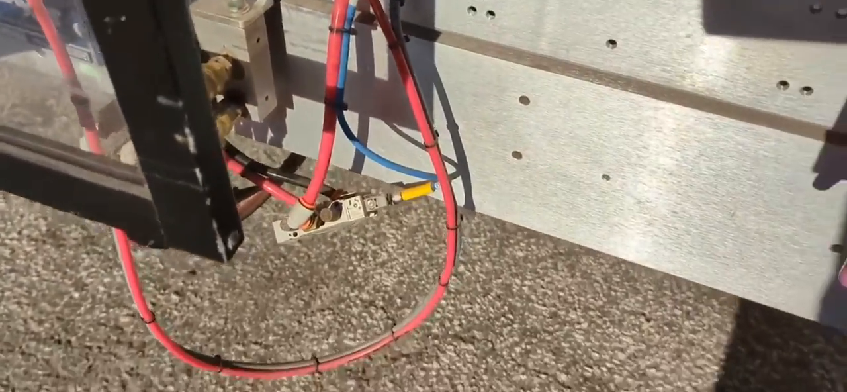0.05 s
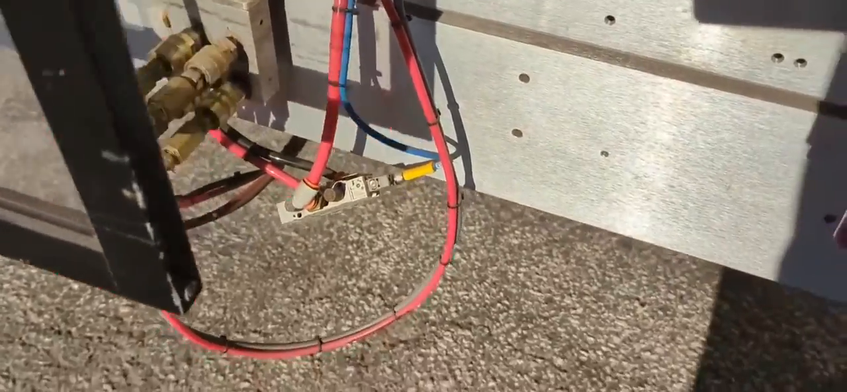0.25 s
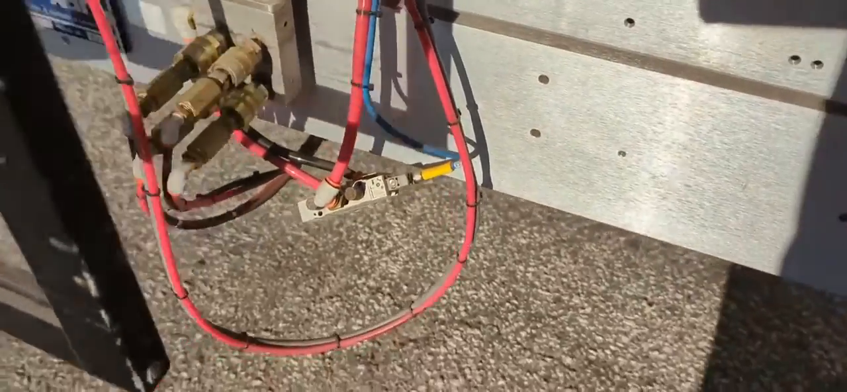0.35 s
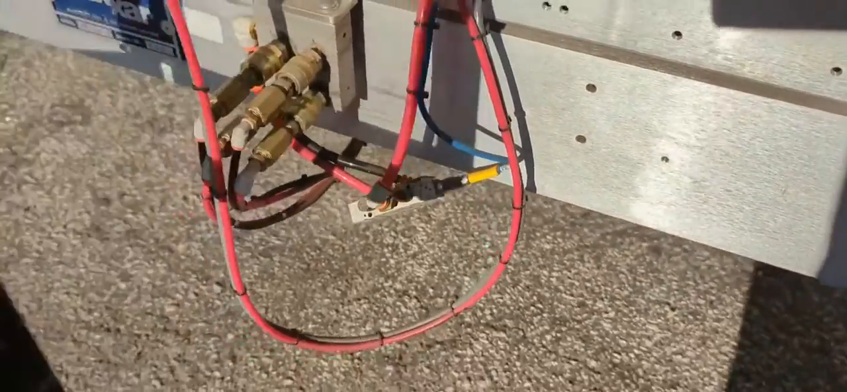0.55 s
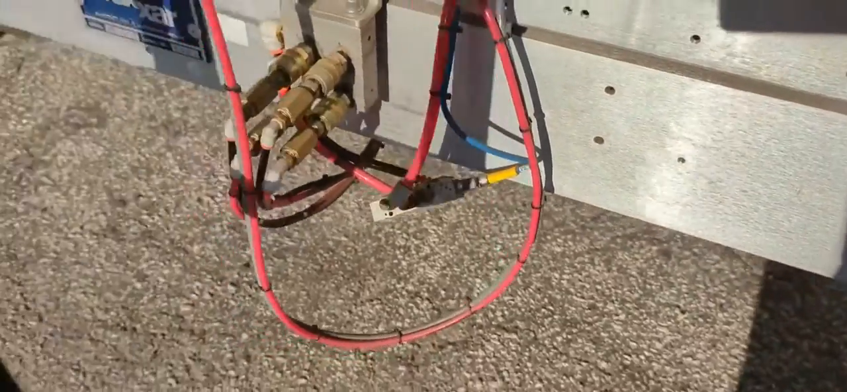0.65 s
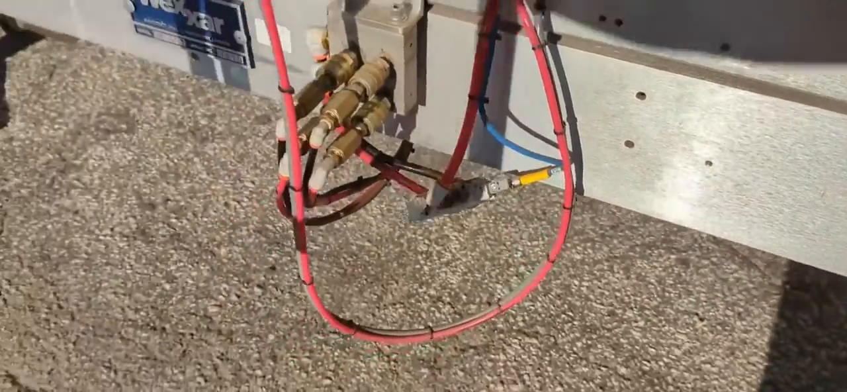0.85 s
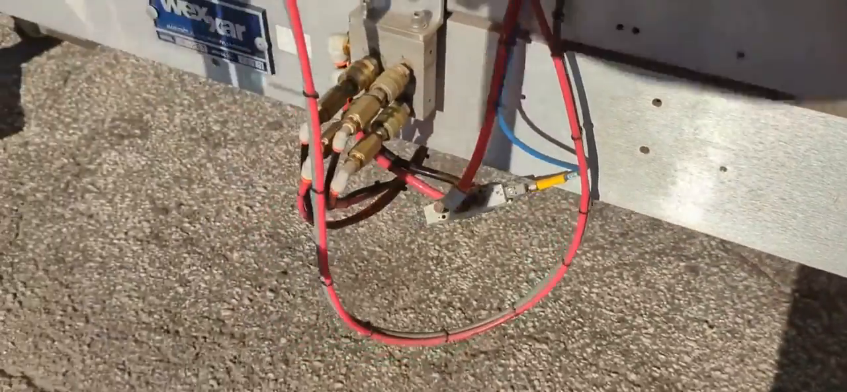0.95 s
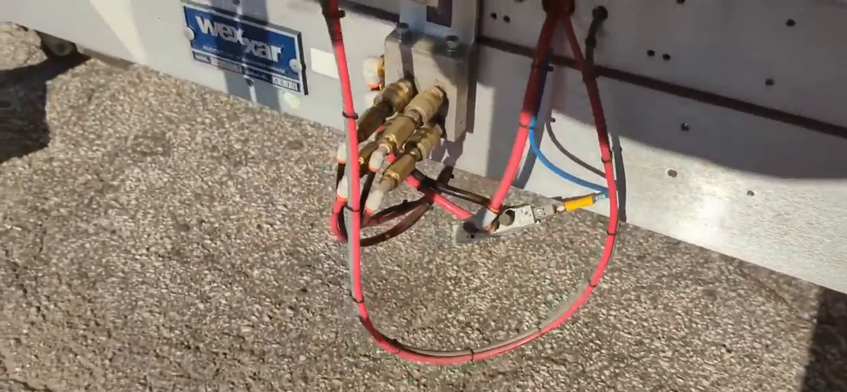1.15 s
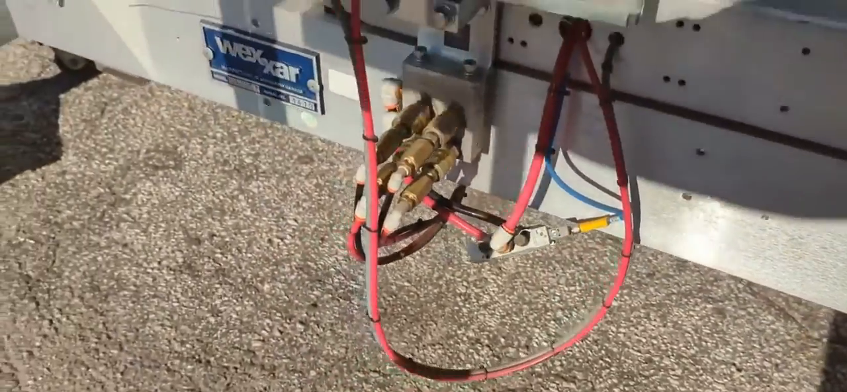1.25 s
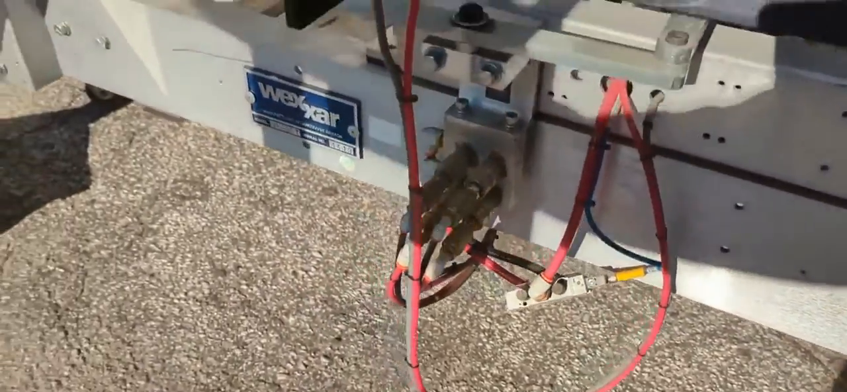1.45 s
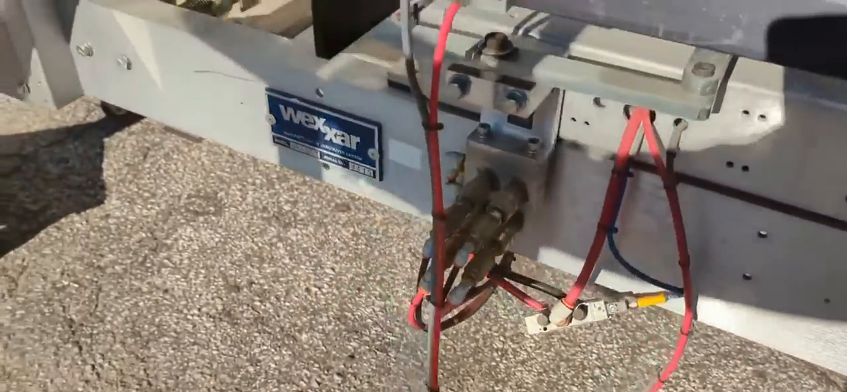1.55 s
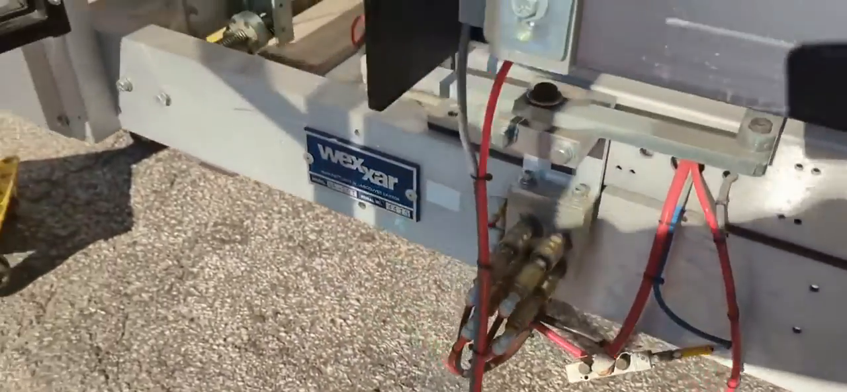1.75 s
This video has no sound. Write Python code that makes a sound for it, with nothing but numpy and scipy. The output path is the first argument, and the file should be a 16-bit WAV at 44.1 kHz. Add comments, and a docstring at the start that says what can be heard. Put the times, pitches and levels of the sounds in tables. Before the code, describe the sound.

Sharp clack and short rattle of a metal machine panel, followed by a gritty shoe scuff.

```python
"""A framed metal panel on a machine is swung aside outdoors: its catch clacks, the frame thumps and
rattles to rest. Each contact wakes a wash of crowded modes and a few clear ones; the hardest hits
add sharp slaps and a short ring from the catch. Then a shoe scuffs the gritty pavement and sets
down, while distant traffic and low wind swell behind."""
import sys
import numpy as np
from scipy import signal
from scipy.fft import rfft, irfft
from scipy.io import wavfile
from scipy.ndimage import uniform_filter1d

SR = 44100
rng = np.random.default_rng(int(sys.argv[2]) if len(sys.argv) > 2 else 0)


def transcribe(u):
    """Save the signal u as a 16-bit wav file named by the first command-line argument.

    u: samples, shape (n,) or (channels, n), limited to [-1, 1]; the rate is SR.
    q: integer samples, one column per channel.
    """
    v = np.clip(np.atleast_2d(u).T, -1, 1)
    q = np.round(v * 32767).astype(np.int16)
    wavfile.write(sys.argv[1], SR, q)


N = 79380
TIME = np.arange(N) / SR
BIN_HZ = np.maximum(np.arange(N // 2 + 1) * SR / N, 1)

# The panel's hits. Each row: start in seconds, drive in dB for the bass, hollow, body, clank and
# treble registers, pan in dB (plus is left).
CONTACTS = [(0.14, -56, -45.5, -50.5, -41, -65, -0.5), (0.161, -42.5, -42, -54, -53, -61, 2),
            (0.1794, -48, -46, -42, -40, -39.5, -1), (.185, -46.5, -42, -39, -41, -63, -2),
            (0.201, -58, -42, -42, -32.5, -66.5, -5.5), (0.2187, -60, -43, -33.5, -29, -20, 0.5),
            (0.2242, -56, -34, -25, -16.5, -36, -1.5), (0.236, -40, -36, -43.5, -24, -30.5, -1.5),
            (0.2552, -49.5, -47, -35.5, -28.5, -28.5, -1.5), (0.2768, -60, -31, -34, -30, -45.5, 3),
            (0.2944, -39, -30, -40, -48, -56, 1), (0.3104, -33, -35, -33, -31, -47, -1.5),
            (0.314, -34.5, -28, -28, -35, -80, 4), (0.331, -33, -35, -47.5, -46, -62, -2.5),
            (0.3417, -54, -58, -35, -36, -59.5, -5.5), (0.4081, -51.5, -45, -40, -44, -73, -5.5),
            (.423, -54.5, -50.5, -45.5, -61.5, -75, -3.5), (0.465, -56, -53.5, -45, -53.5, -79, -2),
            (0.5879, -54.5, -50.5, -44.5, -43.5, -82, -3)]
# The panel's five registers. Each row: low and high edge in Hz, trim in dB, attack and t60 in
# seconds, relative tail level in dB, tail t60 in seconds.
REGISTERS = [(160, 300, -2, .004, 0.049, -11, 0.22), (300, 560, -2.5, 0.0032, 0.14, -16.5, 0.52),
             (560, 1540, 0.5, 0.0011, 0.097, -22.5, 0.57), (1220, 3200, -4.5, 0.00052, 0.077, -26, 0.68),
             (2800, 23000, -1, 0.0012, 0.067, -28.5, 0.36)]
# Clear tones of the metal. Each row: pitch in Hz, dB against its register on a catch hit and on a
# frame hit, t60 in seconds, pan in dB.
CLEAR_MODES = [(203, -2, 1, 0.087, 1.5), (234, 1.5, 8, 0.1, 1.5), (377.6, -6.5, -4, 0.094, 4.5),
               (428, -7.5, -4, 0.11, 6), (518.3, -3.5, 3, 0.09, -4.5), (634, 1, -3, 0.032, 1.5),
               (722.5, -2.5, -13.5, 0.07, -0.5), (837, -17.5, -6, 0.1, 0.5), (933, -3.5, -18.5, 0.13, 0),
               (1104, -8, -10.5, 0.08, -3.5), (1409, -25, -9, 0.12, -1.5), (1923, -8.5, -10, .14, -9.5),
               (2196, -6.5, -27, 0.075, -3), (2438, -7.5, -15, 0.096, -1.5), (4220, -19.5, -16, 0.11, -2.5),
               (7000, -25, -13, .1, 7)]
# The catch's hardest hits. Each row: start in seconds, level in dB, pitch in Hz.
CATCH_RINGS = [(0.2179, -18, 7040), (0.2238, -24, 7090), (0.2541, -27.5, 6790)]
# Small ticks, mostly grit. Each row: start in seconds, level in dB, centre and width in Hz, t60 in seconds.
GRIT_TICKS = [(0.046, -51.5, 10300, 7000, 0.023), (0.732, -68.5, 7000, 8000, 0.039),
              (0.7772, -52, 3590, 1503, 0.023), (1.181, -52.5, 3920, 1800, 0.021),
              (1.308, -33, 1720, 1400, 0.013), (1.315, -38, 2160, 1006, .016),
              (1.334, -44, 3420, 3560, 0.017), (1.345, -38, 2150, 900, 0.016),
              (1.3531, -35, 2800, 3040, 0.0099), (1.3752, -43.5, 4560, 4590, 0.019),
              (1.4461, -31, 3100, 280, 0.017), (1.4465, -54.5, 4730, 3600, 0.037),
              (1.653, -63.5, 7000, 7900, 0.041)]
# The shoe landing. Each row: start in seconds, level in dB, t60 in seconds.
SOLE_LANDINGS = [(1.366, -33.5, 0.23), (1.381, -36.5, 0.32), (1.438, -41.5, 0.27)]

# Tone curves. Each row: frequency in Hz, relative spectral density in dB.
METAL_TONE = [(130, -9.5), (400, -3.5), (660, -1.5), (830, -3.5), (1100, -3), (1330, -12.5), (1700, -2.5),
              (2000, 5), (2450, 0.5), (2750, -12.5), (3400, -11.5), (3800, -14), (4400, -13), (6000, -15.5),
              (7050, -6.5), (7900, -15.5), (12000, -17), (13100, -27), (14800, -18.5), (16000, -31.5)]
GRIT_TONE = [(700, -19.5), (1400, 3.5), (2300, 4), (3100, -10), (4500, -12.5), (7000, -23.5),
             (12000, -23.5), (16000, -31)]
THUD_TONE = [(50, -42.5), (110, 2.5), (200, -1.5), (340, -3.5), (550, -13), (1200, -29), (4000, -74)]
TYRE_TONE = [(60, -11), (130, -3.5), (200, -0.5), (300, -6.5), (520, -1.5), (750, -1), (1100, -4.5),
             (1600, -9), (2400, -15.5), (3100, -30.5), (7000, -48), (15000, -60)]
ENGINE_TONE = [(15, -49.5), (30, -27), (50, -22.5), (68, -8.5), (81, 3), (92, -17), (130, -14),
               (300, -39.5), (1000, -81.5)]
WIND_TONE = [(15, -38.5), (30, -13), (45, -3), (60, 2), (125, 1.5), (200, -3.5), (320, -17.5), (800, -27.5),
             (3000, -69)]
HISS_TONE = [(400, -9), (1300, 1.5), (2500, -1.5), (3300, -13.5), (5000, -24), (7000, -26), (9000, -32),
             (16000, -33)]

# Stereo images. Each row: frequency in Hz, left-right correlation.
METAL_IMAGE = [(240, 0.97), (400, .88), (600, .75), (1000, -.15), (2500, -0.073), (12000, -0.083)]
TYRE_IMAGE = [(100, 1), (300, 0.82), (600, .5), (1100, -0.54), (2500, 0.062), (10000, -0.16)]
BASS_IMAGE = [(30, 0.97), (200, 0.95)]

# Fader rides for the background. Each row: time in seconds, level in dB.
TYRE_FADER = [(0, -56.5), (.68, -51), (.76, -54.5), (.94, -53), (1.05, -45.5), (1.3, -44.5), (1.8, -43)]
ENGINE_FADER = [(0, -66.5), (.3, -54), (.8, -66.5), (1.1, -57), (1.22, -49.5), (1.5, -47), (1.8, -48.5)]
WIND_FADER = [(0, -73), (1.1, -67), (1.35, -59), (1.46, -47.5), (1.58, -50), (1.8, -45.5)]
HISS_FADER = [(0, -57.5), (.65, -60.5), (1.8, -67.5)]


def panel():
    """Hits wake crowded and clear modes in five registers; a faint tail hangs in the machine and yard."""
    out = 0
    for register, (low, high, _, _, t60, tail_db, tail_t60) in enumerate(REGISTERS):
        energy = contact_energy(register)
        power = ring_down(energy, t60) + from_db(tail_db) ** 2 * ring_down(energy, tail_t60)
        crowded_modes = coloured(stereo_noise(METAL_IMAGE), METAL_TONE, band=(low, high))
        out += np.sqrt(power) * steadied(crowded_modes, samples=400)
        for hz, catch_db, frame_db, mode_t60, pan in CLEAR_MODES:
            home_register = sum(hz > top for _, top, *_ in REGISTERS[:-1])
            if home_register == register:
                mode_power = ring_down(contact_energy(register, catch_db, frame_db), mode_t60)
                out += panned(pan) * np.sqrt(mode_power) * clear_tone(hz)
    return out


def contact_energy(register, catch_db=0, frame_db=0, frame_from_s=0.275):
    """Energy the hits feed into one register: first the catch strikes, then the frame."""
    hits = np.array(CONTACTS)
    starts, drive_db, pan = hits[:, 0], hits[:, 1 + register], hits[:, -1]
    trim_db, attack = REGISTERS[register][2:4]
    striker_db = np.where(starts < frame_from_s, catch_db, frame_db)
    hit_db = drive_db + trim_db + striker_db + pan * [[0.5], [-0.5]]
    impulses = np.zeros((2, N))
    impulses[:, (starts * SR).astype(int)] = from_db(hit_db) ** 2
    pole = np.exp(-1 / (attack * SR))  # softens the front of each hit
    return signal.lfilter([1 - pole], [1, -pole], impulses + 1e-18)


def ring_down(energy, t60):
    """Energy left ringing as each hit dies away."""
    return signal.lfilter([1], [1, -from_db(-120 / (t60 * SR))], energy + 1e-18)


def clear_tone(hz):
    """One mode of the metal: a sine, widened by a phase offset between left and right."""
    offset = np.arccos(np.clip(at_hz(METAL_IMAGE, hz), -1, 1))
    return np.sin(2 * np.pi * (hz * TIME + rng.random()) - offset * np.array([[0], [1]]))


def catch_ring(width_hz=260):
    """The small steel catch pings, its pitch shifting with the way it is struck."""
    out = 0
    for start, db, hz in CATCH_RINGS:
        ring = bandpass(rng.standard_normal((2, N)), hz - width_hz / 2, hz + width_hz / 2)
        out += from_db(db) * strike(start, attack=0.00099, t60=0.036) * steadied(ring, samples=100)
    return panned(db=-2) * out


def catch_chatter(slaps_per_s=400, fade_s=0.0013, boost_db=18.5):
    """A few milliseconds of sharp slaps as the metal faces meet."""
    force = sum(from_db(treble_db + boost_db) * (TIME > start) * np.exp(-np.abs(TIME - start) / fade_s)
                for start, *_, treble_db, _ in CONTACTS)
    slaps = (rng.random((2, N)) < slaps_per_s / SR) * rng.choice([-1, 1], (2, N))
    return bandpass(force * slaps, 600, 7000, order=1)


def shoe_scuff(peak_s=1.35, rise_s=0.023, fall_s=0.038, grains_per_s=2600):
    """The sole drags over grit: a quick swell of tiny crunches."""
    swell = np.exp(-np.abs(TIME - peak_s) / np.where(TIME < peak_s, rise_s, fall_s))
    grains = (rng.random((2, N)) < grains_per_s / SR) * rng.standard_normal((2, N))
    return from_db(-44) * swell * coloured(grains, GRIT_TONE)


def grit_ticks(spray_db=-23.5):
    """Small stones tick, each with a broad spray of dust."""
    out = 0
    white = rng.standard_normal((2, N))
    for start, db, hz, width, t60 in GRIT_TICKS:
        stone = steadied(bandpass(white, hz - width / 2, hz + width / 2), samples=200)
        envelope = from_db(db) * strike(start, attack=0.00051, t60=t60)
        out += envelope * (stone + from_db(spray_db) * white)
    return out


def shoe_thud():
    """The shoe sets down in three soft, overlapping thuds."""
    power = sum((from_db(db) * strike(start, attack=0.01, t60=t60)) ** 2
                for start, db, t60 in SOLE_LANDINGS)
    return np.sqrt(power) * steadied(coloured(stereo_noise(BASS_IMAGE), THUD_TONE), samples=1200)


def traffic():
    """A far tyre wash swells over a narrow engine rumble."""
    tyres = panned(db=-1.5) * coloured(stereo_noise(TYRE_IMAGE), TYRE_TONE)
    engine = steadied(coloured(stereo_noise(BASS_IMAGE), ENGINE_TONE), samples=4000)
    return fader(TYRE_FADER) * tyres + fader(ENGINE_FADER) * engine


def wind():
    """Low wind builds towards the end."""
    return fader(WIND_FADER) * coloured(stereo_noise(BASS_IMAGE), WIND_TONE)


def air_hiss():
    """A thin, wide hiss slowly sinks away."""
    return fader(HISS_FADER) * coloured(rng.standard_normal((2, N)), HISS_TONE)


def from_db(db):
    """Decibels to gain."""
    return 10 ** (np.asarray(db) / 20)


def fader(ride):
    """Gain over time along a fader ride."""
    return from_db(np.interp(TIME, *np.transpose(ride)))


def panned(db):
    """Left and right gains; plus leans left."""
    return from_db([[db / 2], [-db / 2]])


def strike(start, attack, t60):
    """Envelope with a quick rise and an exponential fall, all times in seconds."""
    age = np.maximum(TIME - start, 0)
    return (1 - np.exp(-age / attack)) * from_db(-60 * age / t60)


def at_hz(curve, hz):
    """Read a curve on a log-frequency axis."""
    points_hz, values = np.transpose(curve)
    return np.interp(np.log(hz), np.log(points_hz), values)


def bandpass(x, low_hz, high_hz, order=2):
    """Keep the band between two edges."""
    return signal.sosfilt(signal.butter(order, [low_hz, high_hz], "band", fs=SR, output="sos"), x)


def coloured(x, tone, band=None):
    """EQ x with a tone curve and optional steep band edges in Hz; comes out at rms 1."""
    gain = from_db(at_hz(tone, BIN_HZ))
    if band:
        gain /= np.sqrt((1 + (band[0] / BIN_HZ) ** 12) * (1 + (BIN_HZ / band[1]) ** 24))
    shaped = irfft(rfft(x) * gain, N)
    return shaped / shaped.std()


def stereo_noise(image):
    """White noise whose stereo width varies with frequency."""
    correlation = np.clip(at_hz(image, BIN_HZ), -1, 1)
    mid, side = rfft(rng.standard_normal((2, N)))
    return irfft(np.sqrt(1 + correlation) * mid + np.sqrt(1 - correlation) * side * [[1], [-1]], N)


def steadied(x, samples):
    """Hold a noise near rms 1 over a sliding window."""
    return x / np.sqrt(uniform_filter1d((x ** 2).mean(0), samples) + 1e-9)


def scene():
    """Panel and catch up front, then the footstep, with the open air behind."""
    metal = panel() + catch_ring() + catch_chatter()
    footstep = shoe_scuff() + grit_ticks() + shoe_thud()
    return metal + footstep + traffic() + wind() + air_hiss()


def record(dry):
    """Roll off the deepest bass and cut the very top steeply."""
    low_cut = signal.butter(2, 35, "high", fs=SR, output="sos")
    high_cut = signal.ellip(10, 0.2, 80, 16600, fs=SR, output="sos")
    return signal.sosfilt(high_cut, signal.sosfilt(low_cut, dry))


dry = scene()
out = record(dry)
transcribe(out)
```